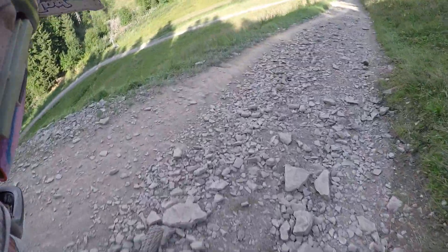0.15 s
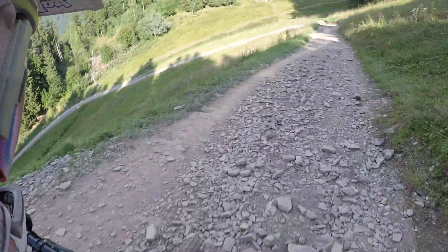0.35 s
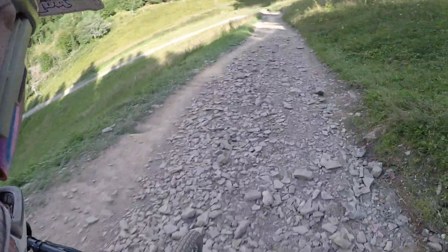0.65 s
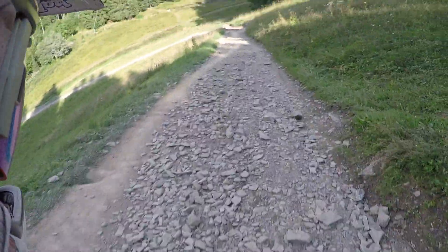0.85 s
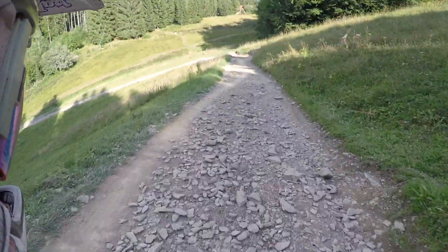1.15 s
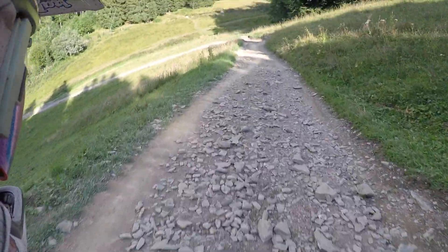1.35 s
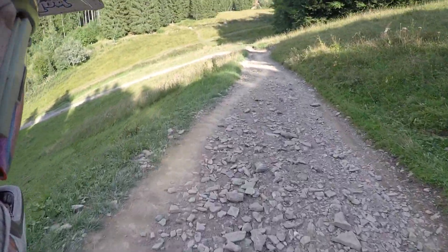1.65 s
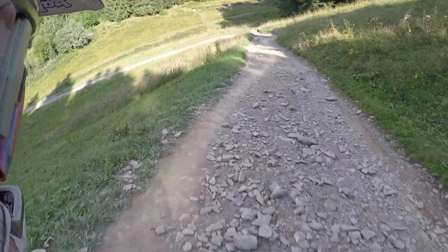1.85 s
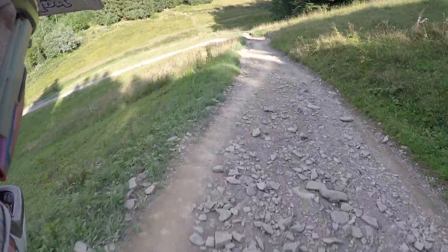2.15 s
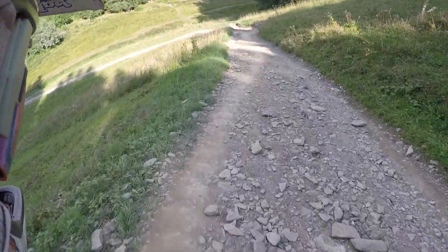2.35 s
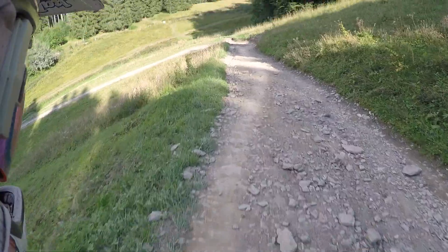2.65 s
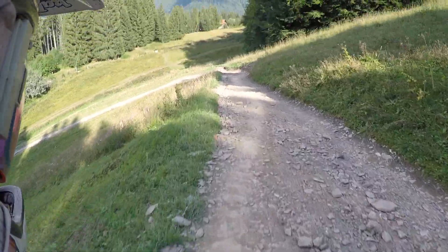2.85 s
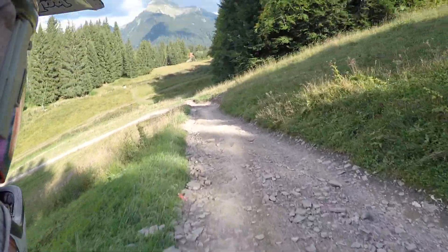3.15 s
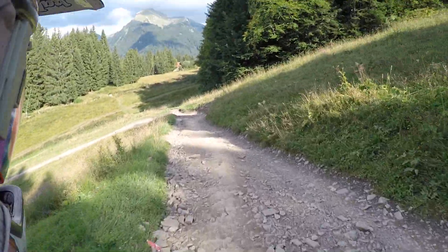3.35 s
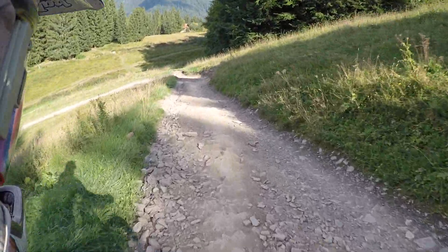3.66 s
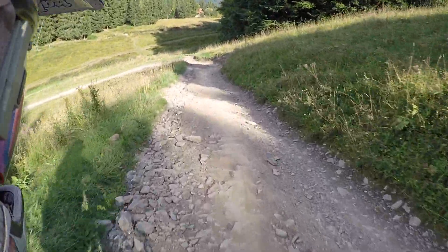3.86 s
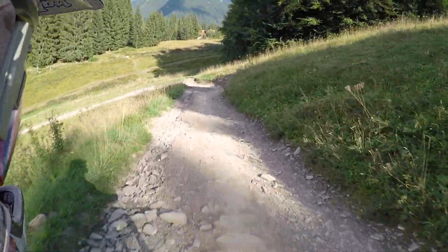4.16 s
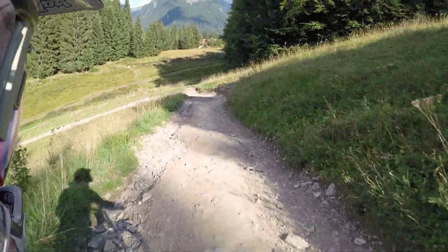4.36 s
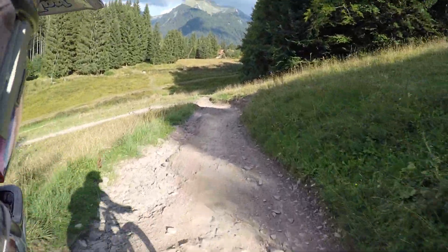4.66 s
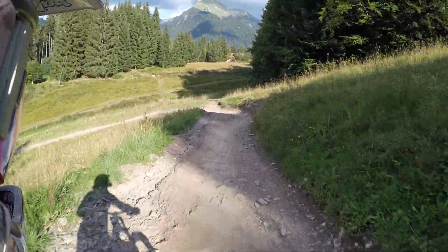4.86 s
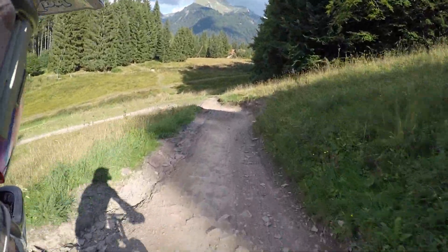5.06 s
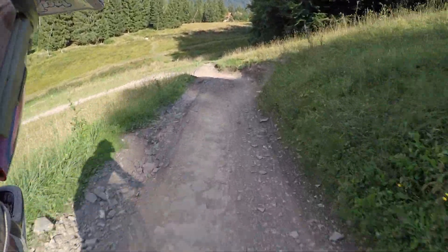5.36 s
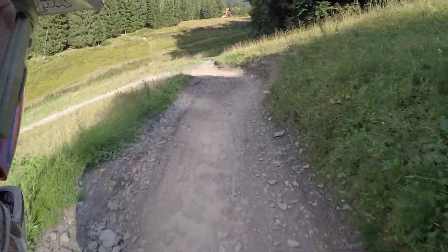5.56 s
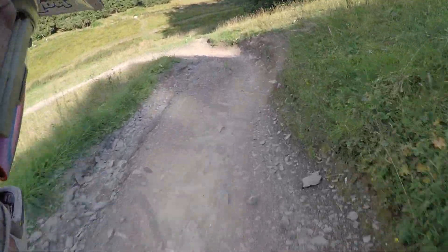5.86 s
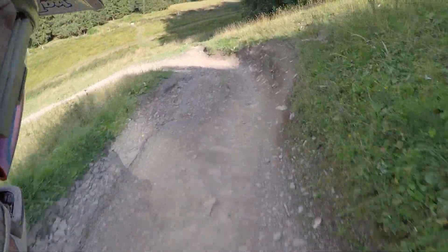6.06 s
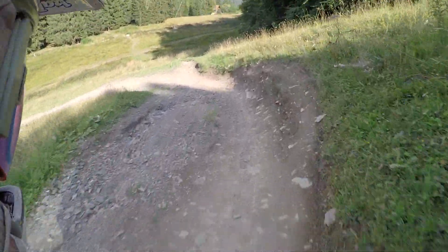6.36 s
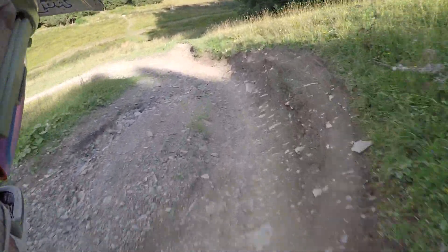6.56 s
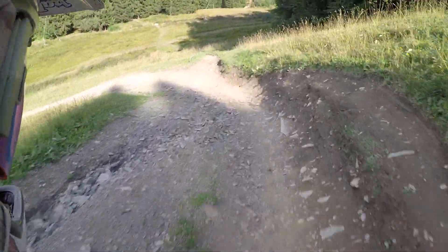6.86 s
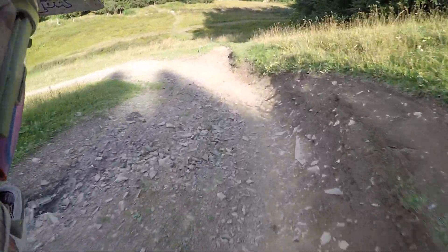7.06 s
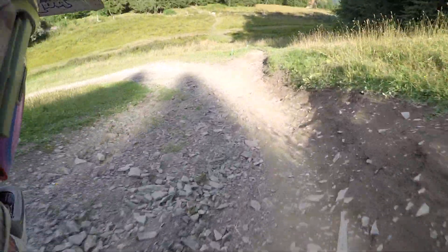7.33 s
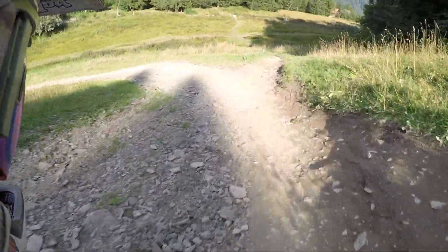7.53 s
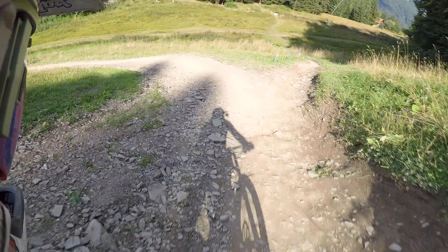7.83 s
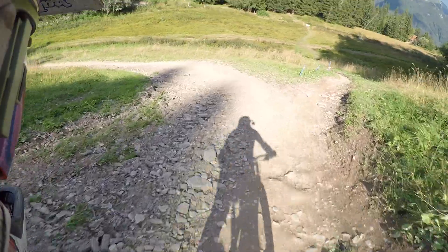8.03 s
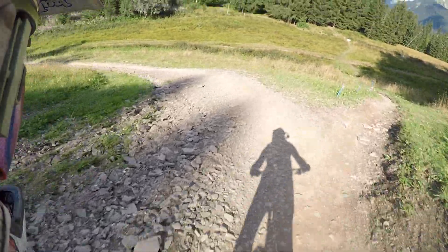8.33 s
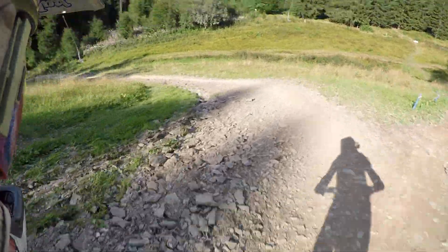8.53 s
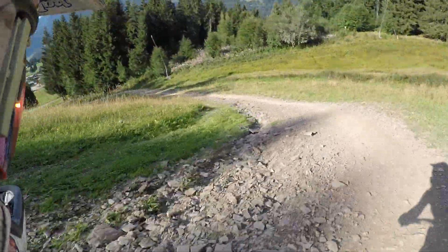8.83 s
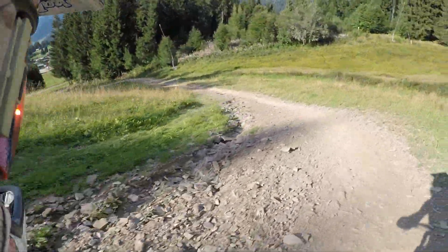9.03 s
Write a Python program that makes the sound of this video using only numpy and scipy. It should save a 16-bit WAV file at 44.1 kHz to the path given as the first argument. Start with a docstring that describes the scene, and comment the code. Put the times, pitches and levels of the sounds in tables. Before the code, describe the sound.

A fast mountain bike ride down a stony open trail, close and slightly boxy, with dulled treble. Hard stone clacks come in irregular clusters at first, over rumbling wind buffets. Afterwards the rolling becomes smoother: tyre drumming, patchy gravel crunch, scattered chips and soft thuds from bumps. Low gusts keep pummelling the microphone to the end.

```python
"""A gust buffets a helmet and stones clack in a quick burst: a mountain bike runs fast down a stony trail.
Heard at a camera on the rider's helmet. Wind is shaped noise in timed gusts; tyres and gravel are dense
random impacts, filtered; stones, rocks and bumps are timed noise bursts with ringing modes.
Coarse rubble in the first seconds gives way to packed dirt; the camera case rings and the treble is cut."""
import sys
import numpy as np
from scipy import signal
from scipy.fft import rfft, irfft, next_fast_len
from scipy.io import wavfile
from scipy.ndimage import uniform_filter1d

SR = 44100
rng = np.random.default_rng(int(sys.argv[2]) if len(sys.argv) > 2 else 0)


def log_audio(samples):
    """Write samples as a 16-bit WAV file to the path given in sys.argv[1]."""
    # one column per channel
    frames = np.atleast_2d(samples).T
    # limit to full scale, then quantise
    limited = np.clip(frames, -1, 1)
    pcm = np.round(limited * 32767).astype(np.int16)
    wavfile.write(sys.argv[1], SR, pcm)


N = 405279
TIME = np.arange(N) / SR

# air stream: (time [s], helmet drone before trim [dB], rush [dB])
AIR = [(0.1, -63, -57), (0.5, -49, -58), (0.9, -60, -53), (1.35, -46.5, -55), (1.72, -34.5, -44),
       (2.1, -44, -48.5), (2.8, -38.5, -46.5), (3.4, -37.5, -44), (4.1, -40, -48), (4.6, -41.5, -47),
       (5.15, -40.5, -42), (5.95, -43.5, -51), (6.6, -43.5, -48), (8.0, -42.5, -49), (9.15, -40, -47)]
# gusts on the helmet: (mid-attack time [s], length before release [s], buffeting before trim [dB],
# treble hiss before trim [dB])
GUSTS = [(0.077, 0.077, -19, -70), (0.277, 0.091, -16, -58), (0.377, 0.19, -16.5, -56.5),
         (0.604, 0.15, -17.5, -54), (0.857, 0.066, -18.5, -68), (1.002, 0.34, -17.5, -59.5),
         (1.386, 0.32, -16, -59.5), (1.811, 0.32, -14.5, -53), (2.18, 0.34, -16, -54.5),
         (3.092, 0.37, -22.5, -75), (3.367, 0.052, -9.5, -60), (3.546, 0.12, -15, -56),
         (3.74, 0.8, -15.5, -56.5), (4.67, 0.24, -14, -50.5), (4.906, 0.58, -15, -53.5),
         (5.486, 0.15, -14.5, -49.5), (5.65, .12, -11, -47), (6.076, 0.09, -15, -57),
         (6.203, .11, -12.5, -67), (6.39, 0.31, -16, -71), (6.759, 0.21, -13.5, -58.5),
         (7.324, 0.28, -16.5, -72), (7.62, 0.23, -14, -59), (7.92, 0.067, -11.5, -50),
         (8.08, 0.13, -16, -63), (8.292, 0.61, -17.5, -57), (8.7, 0.26, -14, -59), (9.09, 0.12, -15.5, -53)]
# ground along the trail: (time [s], tyre roar before trim [dB], gravel crunch before trim [dB])
GROUND = [(0.1, -63, -57), (0.4, -52.5, -55.5), (1.0, -56.5, -51.5), (1.4, -55, -56.5), (1.8, -45, -49),
          (2.15, -48.5, -49.5), (2.75, -50, -56), (3.5, -48.5, -51.5), (3.92, -47.5, -43.5),
          (4.22, -47, -48.5), (4.47, -47, -48.5), (4.58, -49, -49), (4.7, -46, -45), (4.95, -43.5, -44),
          (5.68, -44.5, -38.5), (5.93, -51, -42.5), (6.2, -48, -41), (6.36, -45, -37), (6.52, -49, -43),
          (7.55, -46.5, -41.5), (7.95, -48.5, -44), (8.25, -46, -41.5), (8.8, -45, -44), (9.05, -50, -48)]
# looseness of the ground: (time [s], stone chips over the crunch before trim [dB])
LOOSENESS = [(0, 2.5), (1.4, 4), (1.9, -14), (2.4, 8), (2.7, -16), (3.3, 10.5), (3.9, -10), (4.5, -5),
             (5.5, -5.5), (8.2, -20), (9.19, -1.5)]
# loudest stones struck by the tyres: (time [s], peak before trim [dB], ring [Hz],
# sharp edge before trim and cap [dB])
STONES = [(0.187, -30.5, 2850, -22), (0.196, -20.5, 3300, -23), (0.205, -23.5, 2840, -17),
          (0.218, -16, 3880, -21), (0.2532, -18, 3090, -50), (0.3117, -39, 2900, -28),
          (0.337, -34, 3200, -36), (0.3473, -21, 3220, -35), (0.4484, -41, 3260, -36),
          (0.5245, -34.5, 2570, -11), (0.544, -35, 2590, -11), (0.662, -33, 2850, -24),
          (0.674, -33, 3060, -23), (0.6923, -34, 2930, -29), (0.786, -28, 2930, -15),
          (0.803, -35, 3000, -34), (0.825, -26.5, 3040, -24), (0.8508, -24, 3470, -16),
          (0.8606, -16, 3570, -43.5), (0.9128, -30.5, 2790, -41), (0.977, -36, 2510, -28),
          (1.133, -20, 2830, -46), (1.144, -31, 3100, -30), (1.1563, -30, 3280, -31),
          (1.1914, -29, 2670, -42), (1.233, -21, 3400, -43), (1.246, -33, 2940, -33),
          (1.258, -30.5, 3500, -38), (1.27, -30, 3400, -42), (1.2816, -31, 3360, -42),
          (1.313, -11.5, 3014, -33), (1.3483, -34, 3300, -23), (1.3853, -31.5, 2780, -38),
          (1.475, -15.5, 3300, -39), (1.538, -31, 3100, -24), (1.555, -22.5, 2800, -30),
          (1.568, -21, 2780, -15), (1.6242, -15.5, 3840, -33), (1.628, -20, 3020, -27),
          (1.6337, -18.5, 3080, -35), (1.667, -45, 2530, -34), (1.7, -18.5, 3020, -51),
          (1.718, -23.5, 2560, -40), (1.736, -22, 3040, -37), (1.765, -25.5, 2700, -32),
          (1.777, -26, 2950, -31), (1.798, -34, 3420, -30), (1.8226, -19.5, 3500, -26),
          (1.878, -39, 3000, -35), (1.916, -31, 2600, -29), (1.936, -26.5, 2830, -36),
          (2.003, -21.5, 2770, -34), (2.024, -23.5, 2900, -42), (2.2944, -20.5, 3160, -14),
          (2.3136, -28, 2960, -32), (2.376, -28, 2900, -30), (2.809, -35.5, 2820, -42),
          (3.043, -32.5, 2940, -18), (3.183, -37, 2980, -41), (3.248, -30, 2670, -44),
          (3.309, -33, 2920, -30), (3.419, -33, 2780, -34), (3.452, -33, 2750, -33), (3.67, -33, 2750, -45),
          (3.7398, -29.5, 2580, -42), (3.8364, -28, 2800, -24), (3.9564, -30, 2500, -34),
          (3.9762, -30, 2280, -36), (4.011, -31.5, 2940, -30), (4.0775, -26, 3180, -28),
          (4.147, -36, 2550, -35), (4.1927, -31, 2520, -28), (4.3111, -31.5, 2680, -39),
          (4.441, -32, 2270, -34), (4.517, -28, 2700, -25), (4.673, -34, 2530, -16),
          (4.968, -29, 2560, -43), (5.077, -27.5, 2770, -23), (5.1367, -28.5, 2940, -14),
          (5.292, -33, 2970, -40), (5.413, -24.5, 2860, -54), (5.5277, -26, 2910, -43),
          (5.647, -25, 2970, -32), (5.957, -26, 3530, -23), (7.2228, -24, 2050, -38),
          (7.2292, -24, 2310, -23), (7.3428, -16.5, 2430, -38), (8.7487, -30.5, 3000, -28),
          (8.905, -31.5, 2800, -22), (9.0244, -29.5, 3400, -50), (9.1523, -33.5, 3470, -6)]
# rocks knocking through the wheels into the frame: (time [s], peak before trim [dB], ring [Hz], contact [s])
KNOCKS = [(0.329, -38, 810, 0.018), (0.361, -24.5, 1020, 0.0065), (0.478, -38, 1100, 0.025),
          (0.592, -36, 740, 0.012), (0.716, -37, 840, 0.02), (0.75, -39, 820, 0.0085),
          (0.914, -41, 660, 0.0066), (1.099, -39.5, 1300, 0.042), (1.533, -37, 705, 0.0055),
          (1.629, -29.5, 1406, 0.0046), (1.911, -33.5, 1210, 0.0044), (2.356, -29, 1420, 0.0039),
          (3.116, -29.5, 694, 0.0051), (3.367, -30, 674, 0.0039), (3.938, -34, 1230, 0.0061),
          (6.26, -37, 700, 0.022), (8.617, -29.5, 1160, 0.0076)]
# bumps that jolt the helmet: (time [s], thud [dB], rocking [dB], shake before trim, over the thud [dB])
JOLTS = [(0.359, -16, -2, -17.5), (0.586, -21, -6, -18), (0.982, -31.5, -9, -15), (1.809, -18.5, -8.5, -32),
         (2.238, -20.5, -16, -27), (2.71, -26, -24, -31), (3.571, -24, -15, -18), (4.664, -26, -11, -19),
         (5.11, -26, -9, -18), (5.669, -25, -12, -35), (6.208, -15, -10, -33), (6.44, -25, -18, -26),
         (6.894, -19, -8, -36), (7.358, -19, -16, -20)]
# tread hum: (time [s], pitch [Hz], level [dB])
HUM = [(2.2, 240.4, -97), (2.75, 266.7, -58), (3.25, 308, -53), (3.6, 305, -73), (4.4, 278, -95)]
# small metal parts that ting: (time [s], peak [dB], pitch [Hz])
TINGS = [(1.187, -58, 10430)]
# camera case resonances: (centre [Hz], width before narrowing by the lift [Hz], lift [dB])
CASE_MODES = [(221.6, 19, 10.5), (315.6, 66, 5), (666, 94, 7), (880, 88, 7.5), (1192, 175, 9),
              (2535, 1000, 7.5), (2930, 147, 8.5), (3429, 190, 8), (4580, 33, 6.5)]

# relative spectrum of the helmet buffeting: (frequency [Hz], level [dB])
BUFFET_COLOUR = [(10, -16.5), (20, -1), (29, 2.5), (39, 2), (50, -17), (65, -27), (85, -36), (140, -47.5),
                 (300, -90.5)]
# relative spectrum of the drone in the helmet shell: (frequency [Hz], level [dB])
DRONE_COLOUR = [(45, -42), (70, -16), (85, -3), (94, 1), (106, -11.5), (135, -21), (200, -36),
                (500, -101.5)]
# relative spectrum of the air rush and the jolt shake: (frequency [Hz], level [dB])
RUSH_COLOUR = [(80, -8), (140, -0.5), (200, -2.5), (300, -7), (400, -14), (600, -21), (1500, -48)]
# relative spectrum of the treble hiss and the sand spatter: (frequency [Hz], level [dB])
HISS_COLOUR = [(2500, 7), (5000, 7), (7800, 4), (9500, 4), (12000, 1), (15500, -1.5)]
# relative spectrum of the tyre roar and the frame knocks: (frequency [Hz], level [dB])
TYRE_COLOUR = [(250, -18.5), (470, -1.5), (570, -4.5), (750, 0.5), (1020, -3.5), (1300, -4), (1500, -6),
               (1750, -13.5), (3000, -21), (6000, -72)]
# relative spectrum of crushed grit: (frequency [Hz], level [dB])
GRAVEL_COLOUR = [(600, -21), (1200, 1.5), (1500, 5.5), (1900, 0.5), (2300, 0.5), (3000, -4), (3700, -2),
                 (4300, -7), (5000, -22), (7000, -19.5), (12000, -29)]
# relative spectrum of small chips: (frequency [Hz], level [dB])
CHIP_COLOUR = [(600, -52), (1700, -5), (2400, -1), (3000, -2), (3900, -1), (4600, -10), (5400, -6.5),
               (8000, 2.5), (14000, -40)]
# relative spectrum of stone chatter: (frequency [Hz], level [dB])
STONE_COLOUR = [(400, -41), (1200, 2), (2000, 1.5), (2800, 0.5), (3800, 5.5), (4700, -2.5), (5600, -14),
                (8000, -9.5), (14000, -19)]

GUST_ATTACK_S, GUST_RELEASE_S = 0.0282, 0.046
GUST_TRIM_DB, GUST_HISS_TRIM_DB, DRONE_TRIM_DB = 1.05, -4, -1.5
LULL_DB, LULL_HISS_DB = -24, -64.5  # buffeting between gusts, steady hiss
ROAR_TRIM_DB, CRUNCH_TRIM_DB, CHIP_TRIM_DB = -0.5, 0.07, -0.5
WHINE_HZ, WHINE_DB = 8630, -81
TOP_HZ = 15000


def undb(db):
    """Decibels to gain."""
    return 10 ** (np.asarray(db) / 20)


def unit(x):
    """Scale to rms 1."""
    return x / np.sqrt(np.mean(x ** 2))


def noise(count=N):
    """White noise."""
    return rng.standard_normal(count)


def curves(table):
    """Each column of a timed table, interpolated at every sample."""
    times_s, *columns = np.transpose(table)
    return [np.interp(TIME, times_s, column) for column in columns]


def add(out, time_s, sound):
    """Mix a short sound in at time_s."""
    start = max(int(time_s * SR), 0)
    out[start:start + len(sound)] += sound[:max(N - start, 0)]


def walk(rate_hz):
    """Smoothed random steps, about rate_hz a second; rms 1 before the final cut to length."""
    step = max(int(SR / rate_hz), 2)
    held = np.repeat(noise(N // step + 1), step)
    return unit(uniform_filter1d(held, step))[:N]


def colour(x, points):
    """Minimum-phase filter through (Hz, dB) points, built by folding the cepstrum."""
    size = 2 * next_fast_len(len(x))
    hz, db = np.transpose(points)
    grid_hz = np.maximum(np.fft.rfftfreq(size, 1 / SR), 1)
    gain = undb(np.interp(np.log(grid_hz), np.log(hz), db))
    cepstrum = irfft(np.log(gain))
    cepstrum[1:size // 2] *= 2
    cepstrum[size // 2 + 1:] = 0
    response = np.exp(rfft(cepstrum))
    return irfft(rfft(x, size) * response)[:len(x)]


def ring(x, hz, width_hz):
    """One resonance, gain 1 at its centre."""
    b, a = signal.iirpeak(hz, hz / width_hz, fs=SR)
    return signal.lfilter(b, a, x)


def ping(t, hz, swell_s):
    """One mode at random phase: envelope peaks at swell_s, then dies away; rms 1."""
    tone = np.sin(2 * np.pi * (hz * t + rng.random()))
    return unit(tone * t * np.exp(-t / swell_s))


def impacts(rate_hz, spread_db):
    """Sparse random-sign impulses; sizes in dB are exponentially spread, upward or downward from 0."""
    hit = rng.random(N) < rate_hz / SR
    size = undb(spread_db * np.minimum(rng.standard_exponential(N), 5))
    return hit * size * rng.choice([-1, 1], N)


def case(x):
    """The camera case lifts its own resonances, in series."""
    for hz, width_hz, lift_db in CASE_MODES:
        x = x + (undb(lift_db) - 1) * ring(x, hz, width_hz / undb(lift_db / 2))
    return x


def wind():
    """The air stream buffets the helmet, drones in its shell and rushes past.

    A faint treble hiss flutters in step with the low swings."""
    drone_db, rush_db = curves(AIR)
    pressure, gust_hiss = gusts()
    sway, swirl = eddies(), walk(16)
    drone = unit(colour(noise(), DRONE_COLOUR)) * undb(drone_db + DRONE_TRIM_DB + 1.46 * swirl)
    rush = unit(case(colour(noise(), RUSH_COLOUR))) * undb(rush_db + 1.2 * swirl)
    flutter = unit((0.2 + np.abs(sway)) * undb(3.9 * walk(24) + 2.2 * walk(70)))
    # steady and fluttering hiss add in power
    hiss_gain = np.hypot(undb(LULL_HISS_DB), flutter * gust_hiss * undb(GUST_HISS_TRIM_DB))
    hiss = unit(colour(noise(), HISS_COLOUR)) * hiss_gain
    return sway * pressure + drone + rush + hiss


def gusts():
    """Gain curves of buffeting and treble hiss: each gust builds quickly, holds and drops into the lull."""
    pressure, hiss = np.full(N, undb(LULL_DB)), np.zeros(N)
    for time_s, length_s, buffet_db, hiss_db in GUSTS:
        hold_s = max(length_s - GUST_ATTACK_S, 0)
        corners_s = np.cumsum([time_s - GUST_ATTACK_S / 2, GUST_ATTACK_S, hold_s, GUST_RELEASE_S])
        shape = np.interp(TIME, corners_s, [0, 1, 1, 0])
        pressure = np.maximum(pressure, undb(buffet_db + GUST_TRIM_DB) * shape)
        hiss = np.maximum(hiss, undb(hiss_db) * shape)
    return pressure, hiss


def eddies(evenness=0.21):
    """Eddies rock the helmet some thirty times a second, swings partly evened out; rms 1."""
    sway = signal.hilbert(colour(noise(), BUFFET_COLOUR))
    swing = uniform_filter1d(np.abs(sway), SR // 40)
    return unit(sway.real / swing ** evenness)


def tyres(roar_db, load):
    """Tread blocks slap the uneven ground and drum on the tyre walls, harder under load."""
    slaps = impacts(rate_hz=2200, spread_db=1.0) * undb(1.03 * load)
    drumming = colour(patchy(slaps, spread_db=1.27, rate_hz=25), TYRE_COLOUR)
    return unit(case(drumming)) * undb(roar_db + ROAR_TRIM_DB)


def gravel(crunch_db, load):
    """Grit is crushed in a dense, patchy crunch; on loose ground it gives way to chips."""
    grit = impacts(rate_hz=1600, spread_db=-2.5) * undb(load)
    crunch = unit(case(colour(patchy(grit, spread_db=1.73, rate_hz=45), GRAVEL_COLOUR)))
    loose = undb(curves(LOOSENESS)[0])
    mix = crunch + undb(CHIP_TRIM_DB) * loose * chips(2.0 * load)
    return mix / np.hypot(1, loose) * undb(crunch_db + CRUNCH_TRIM_DB)


def patchy(x, spread_db, rate_hz):
    """Stones of differing size pass under the tyre, so each register swells and fades on its own."""
    for hz in np.geomspace(800, 4000, num=7):
        x = x + (undb(spread_db * walk(rate_hz)) - 1) * ring(x, hz, hz / 4)
    return x


def chips(load_db):
    """Small chips of many sizes click against each other; rms 1."""
    sizes_hz = np.geomspace(2200, 4500, num=12)
    clicks = sum(ring(impacts(rate_hz=16, spread_db=2.2), hz, 600) for hz in sizes_hz)
    return unit(case(colour(clicks * undb(load_db), CHIP_COLOUR)))


def stones(contact_s=0.0016, contact_spread_db=2.5, rattle_s=0.012, rattle_db=-17.0,
           edge_trim_db=15, ring_s=0.00075, ring_db=-2, blunt=0.81, side_db=-3,
           overtone_ratio=2.2, overtone_db=-8, shape_spread=0.19, trim_db=-0.5):
    """Each stone chatters for a millisecond or two, rings with its own modes and rattles as it settles."""
    out, t = np.zeros(N), TIME[:2048]
    for time_s, peak_db, hz, edge_db in STONES:
        touch_s = contact_s * undb(contact_spread_db * (2 * rng.random() - 1))  # some snap, some scrape
        strike = noise(len(t)) * t / touch_s * np.exp(1 - t / touch_s)
        bounces = unit(noise(len(t)) * (rng.random(len(t)) < 500 / SR))
        contact = strike + undb(rattle_db) * bounces * np.exp(-t / rattle_s)
        edge = undb(min(edge_db + edge_trim_db, 3)) * ring(strike, 5400, 2400)
        chatter = case(colour(ring(contact, hz, 1350) + edge, STONE_COLOUR))
        # the stone's shape sets a second mode near the first, and a high overtone
        shape = 1 + shape_spread * (2 * rng.random(2) - 1)
        side_hz, high_hz = hz * np.array([1, overtone_ratio]) * shape
        modes = ping(t, hz, ring_s) + undb(side_db) * ping(t, side_hz, ring_s)
        # a blunt strike leaves mostly the ring, a sharp one mostly chatter and the overtone
        rings = undb(ring_db - blunt * (edge_db + 36.5)) * modes
        overtone = undb(edge_db + overtone_db) * ping(t, high_hz, 2 * ring_s)
        clack = unit(chatter) + rings + overtone
        add(out, time_s, undb(peak_db + trim_db) * clack / np.abs(clack).max())
    return out


def debris(debris_db=-36, follow=0.51, scatter_s=0.012):
    """A struck stone scatters its neighbours, which click for a moment afterwards."""
    stir, t = np.zeros(N), TIME[:SR // 4]  # stir is power
    burst = t / scatter_s * np.exp(-t / scatter_s)
    for time_s, peak_db, _, _ in STONES:
        add(stir, time_s, undb(follow * peak_db + debris_db) ** 2 * burst)
    return chips(0) * np.sqrt(stir)


def knocks(ring_s=0.0051, ring_db=-9.5, trim_db=1.5):
    """A rock strikes through the tyre and the frame gives a short hollow knock."""
    out, t = np.zeros(N), TIME[:4096]
    for time_s, peak_db, hz, contact_s in KNOCKS:
        # the tyre squeezes onto the rock and lets go
        blow = noise(len(t)) * t * np.exp(-(t / contact_s) ** 2)
        body = unit(case(colour(ring(blow, hz, 560), TYRE_COLOUR)))
        knock = body + undb(ring_db) * ping(t, hz, ring_s)
        add(out, time_s, undb(peak_db + trim_db) * knock / np.abs(knock).max())
    return out


def jolts(thud_hz=62, thud_s=0.015, helmet_hz=94, helmet_s=0.018, helmet_db=-6,
          rock_hz=37, rock_s=0.0815, shake_s=0.01, shake_trim_db=5):
    """A bump swells into a soft thud, rocks the helmet, sets it ringing and shakes the camera case."""
    out, t = np.zeros(N), TIME[:SR // 2]
    rock = -np.sin(2 * np.pi * rock_hz * t) * np.sin(np.pi * np.minimum(t / rock_s, 1)) ** 2
    push = unit(np.sin(2 * np.pi * thud_hz * t) * t * np.exp(-t / thud_s))
    for time_s, thud_db, rock_db, shake_db in JOLTS:
        shake = case(colour(noise(len(t)) * t * np.exp(-t / shake_s), RUSH_COLOUR))
        thud = push + undb(helmet_db) * ping(t, helmet_hz, helmet_s)
        bump = thud + undb(shake_db + shake_trim_db) * unit(shake)
        add(out, time_s, undb(thud_db) * bump / np.abs(thud).max() + undb(rock_db) * rock)
    return out


def tread():
    """On smooth ground the tread knobs come round evenly enough to hum: a randomly modulated tone."""
    hz, level_db = curves(HUM)
    turn = np.exp(2j * np.pi * np.cumsum(hz) / SR)
    unsteady = turn * (walk(60) + 1j * walk(60))
    return unit(unsteady.real) * undb(level_db)


def spatter(rate_hz=22, spread_db=4.5, tick_s=0.0022, level_db=-71):
    """Sand thrown up by the front wheel ticks on the frame and the helmet: decaying noise bursts."""
    t = TIME[:1024]
    power = signal.fftconvolve(impacts(rate_hz, spread_db) ** 2, np.exp(-2 * t / tick_s))[:N]
    ticks = np.sqrt(np.abs(power)) * noise()
    return unit(colour(ticks, HISS_COLOUR)) * undb(level_db)


def tings(swell_s=0.0052):
    """Flying grit touches a small metal part, which gives one thin high note."""
    out, t = np.zeros(N), TIME[:SR // 4]
    for time_s, peak_db, hz in TINGS:
        note = ping(t, hz, swell_s)
        add(out, time_s, undb(peak_db) * note / np.abs(note).max())
    return out


def whine(waver_db=-2):
    """The camera's electronics sing one thin, unsteady tone."""
    carrier = np.exp(2j * np.pi * WHINE_HZ * TIME)
    waver = 1 + undb(waver_db) * (walk(30) + 1j * walk(30))
    return unit((carrier * waver).real) * undb(WHINE_DB)


def scene():
    """Wind, wheels and stones at one microphone, with the camera's faint whine."""
    roar_db, crunch_db = curves(GROUND)
    # the wheels press and lift over ruts, stones and pebbles
    load = unit(0.43 * walk(12) + walk(50) + 0.19 * walk(160))
    ground = tyres(roar_db, load) + gravel(crunch_db, load) + stones() + debris() + tread() + spatter()
    bike = knocks() + jolts() + tings()
    return (wind() + ground + bike + whine())[None]


def record(dry):
    """The camera cuts the top with a steep elliptic low-pass."""
    low_pass = signal.ellip(8, 0.2, 70, TOP_HZ, fs=SR, output="sos")  # order, ripple [dB], stopband [dB]
    return signal.sosfilt(low_pass, dry)


dry = scene()
out = record(dry)
log_audio(out)
```